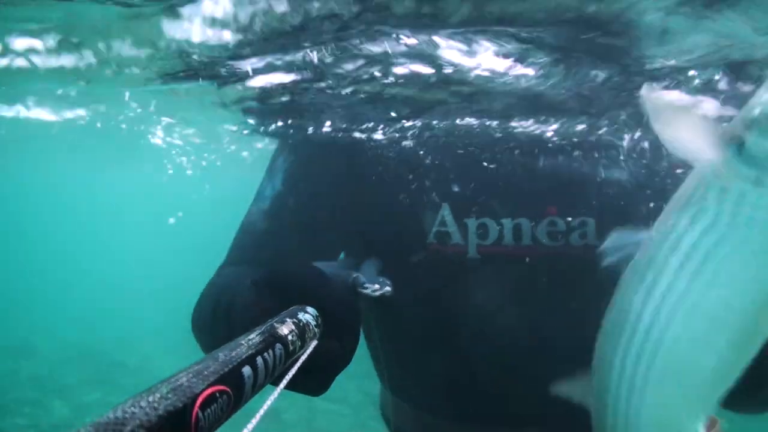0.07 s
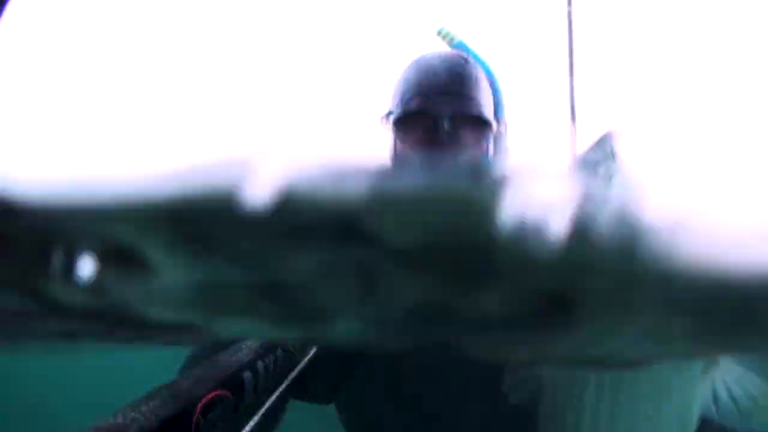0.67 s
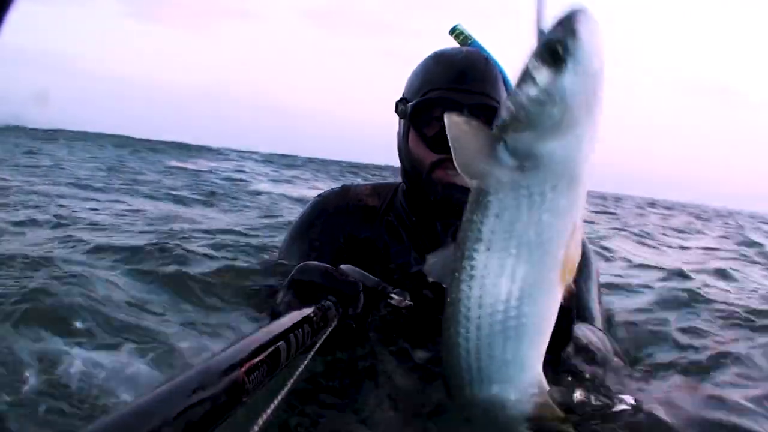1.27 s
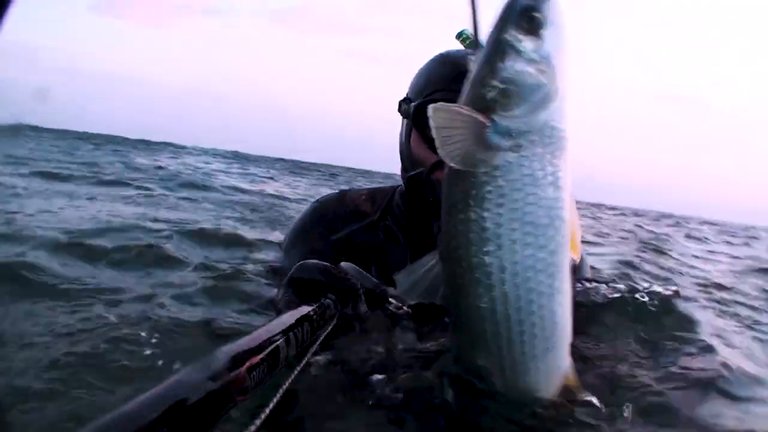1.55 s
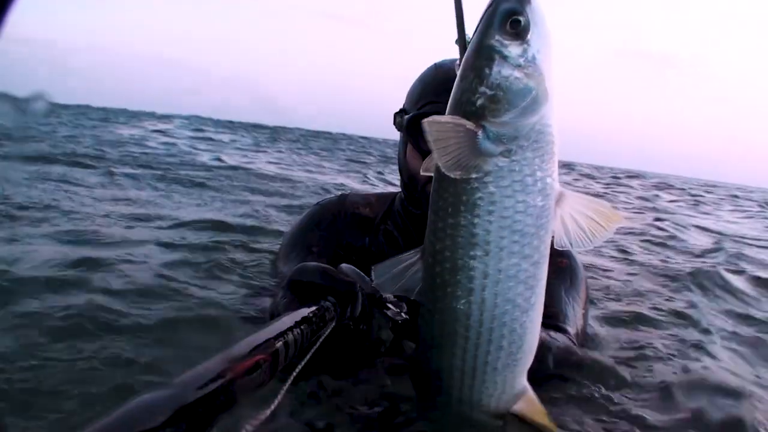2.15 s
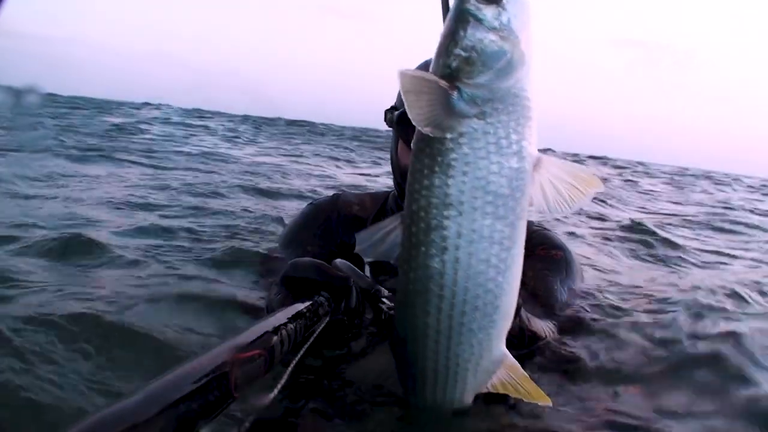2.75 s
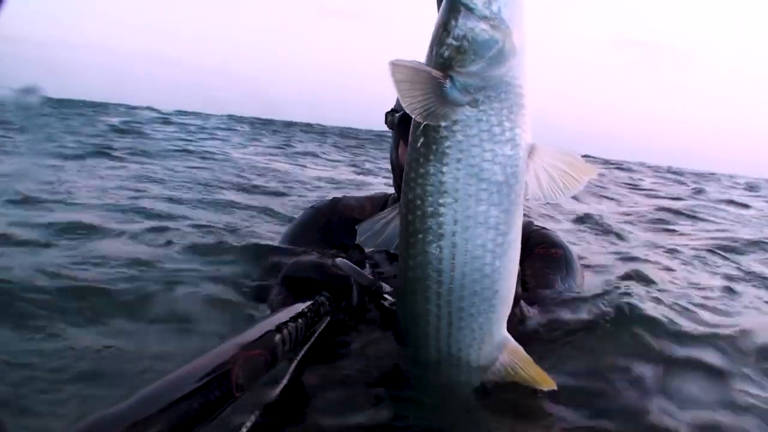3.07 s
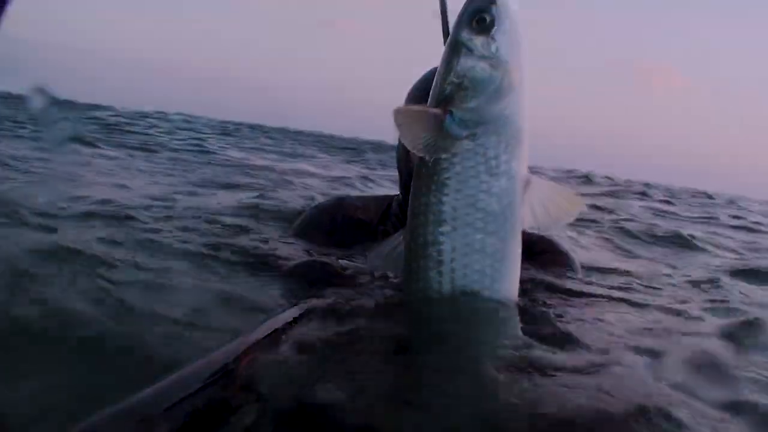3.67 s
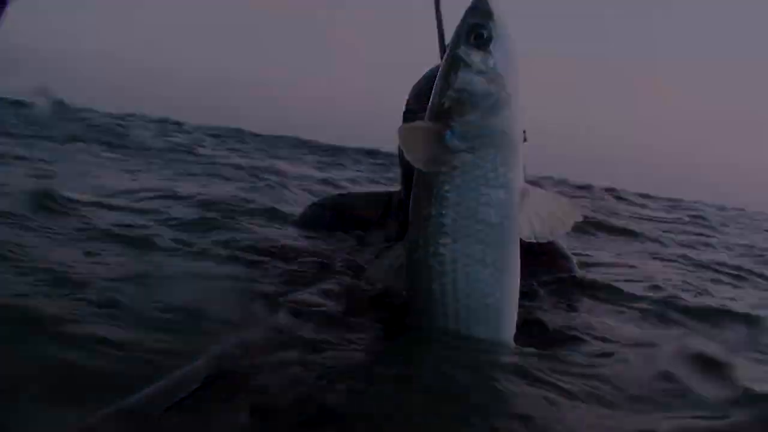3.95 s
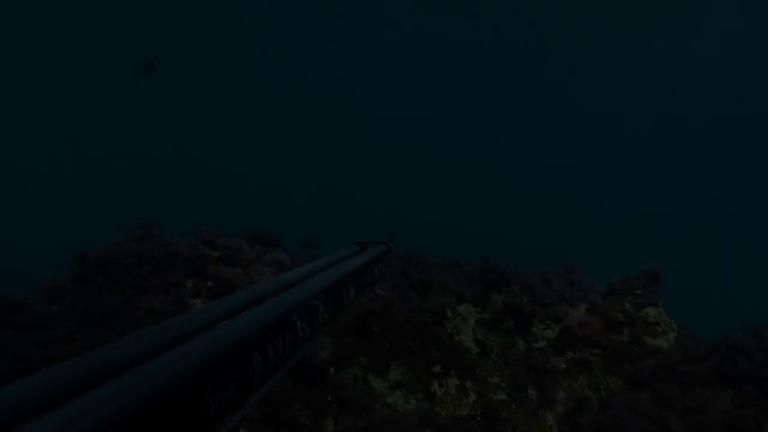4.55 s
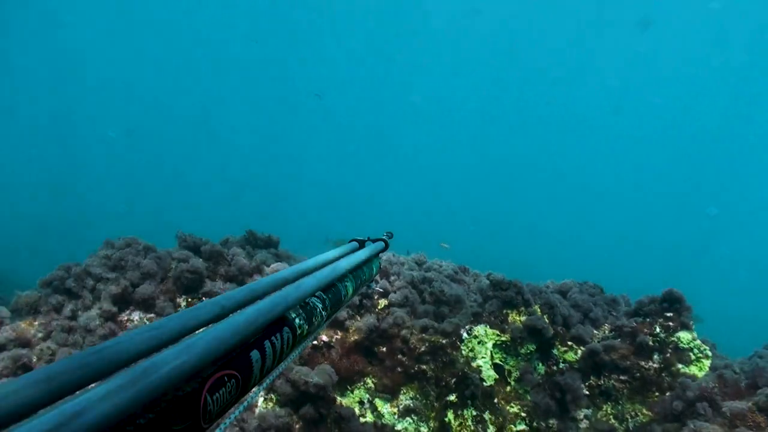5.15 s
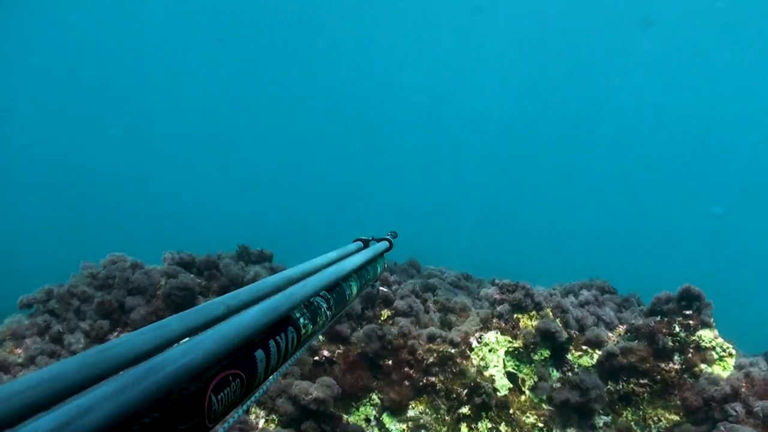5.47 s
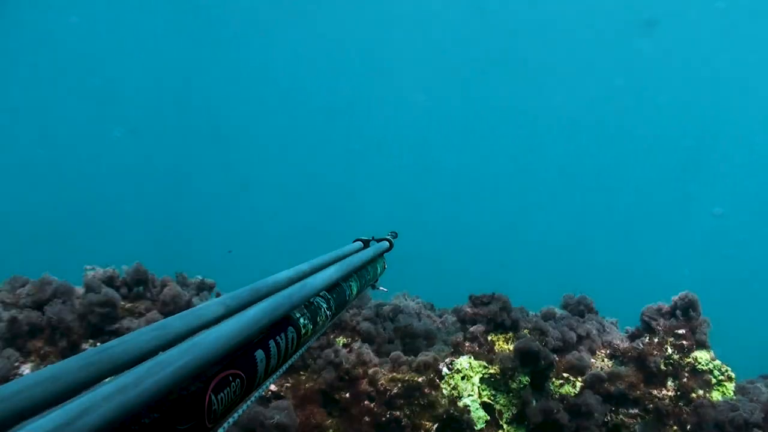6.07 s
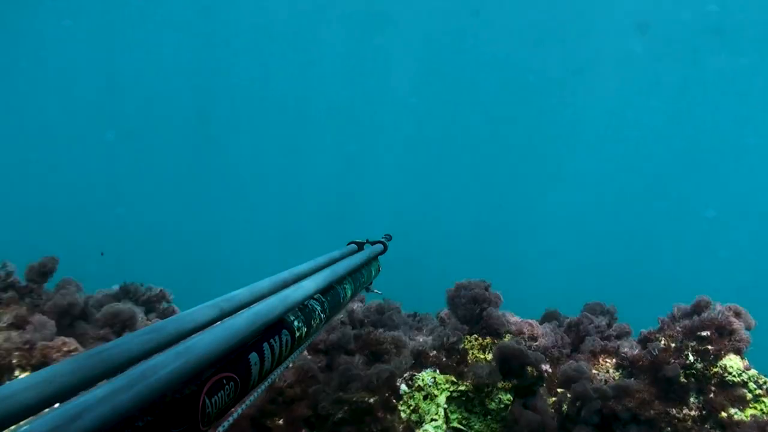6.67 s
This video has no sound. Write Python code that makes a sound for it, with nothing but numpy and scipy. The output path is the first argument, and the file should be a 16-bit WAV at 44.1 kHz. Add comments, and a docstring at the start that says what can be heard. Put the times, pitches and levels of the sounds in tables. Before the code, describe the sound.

Heard very close through a waterproof camera housing, a sudden bubbly splash comes up out of the sea, followed by fizzing runoff and drips. Small waves gurgle, plop and knock against the case, with a thin, faint whine behind them. A hard wet slap and a low rising wash end in an abrupt change to underwater quiet: crackling shrimp, a few sharper clicks, dull soft rubbing from a speargun and steady hiss.

```python
"""A sharp burst of bubbles and spray, then gurgles, plops and slaps, then an abrupt change to a quiet reef.
A camera on a speargun breaks the sea surface and floats in light chop: trapped air pockets ring,
wavelets knock the housing, water runs off, and the camera's electronics whine faintly.
On the reef, shrimp snap and the gun rubs softly, coloured by the submerged housing's resonances."""
import sys
import numpy as np
from scipy.fft import rfft, irfft, next_fast_len
from scipy.io import wavfile
from scipy.ndimage import map_coordinates

SR = 44100
rng = np.random.default_rng(int(sys.argv[2]) if len(sys.argv) > 2 else 0)


def wav_out(sig):
    """Save sig, one row per channel (or a flat mono array), as 16-bit PCM at SR to the path in sys.argv[1]."""
    wavfile.write(sys.argv[1], SR, np.round(np.clip(np.atleast_2d(sig).T, -1, 1) * 32767).astype(np.int16))


N = 304290


def bubble(db, hz, rise_s, life_s, sharp, settle_s=0.0044, decay_power=1.4):
    """An air pocket swells into tone, gliding from hz * (1 + sharp) to hz as it settles on the wall."""
    t = np.arange(int(4 * life_s * SR)) / SR
    cycles = hz * (t + sharp * settle_s * (1 - np.exp(-t / settle_s)))
    attack = 1 - np.exp(-(t / rise_s) ** 2)
    return amp(db) * np.sin(2 * np.pi * cycles) * attack * np.exp(-(t / life_s) ** decay_power)


def plops():
    """Air pockets pinch off with a wet smack and ring; larger, lower ones swell more slowly."""
    # Each row: start in seconds, level in dB, pitch in Hz, life in seconds, initial pitch offset ratio.
    pockets = [(0.044, -51.5, 253, 0.047, 0.02), (.077, -42, 1113, 0.014, 0.086),
               (.4347, -26, 2880, 0.0061, 0.01), (0.4436, -3.5, 1810, .0068, 0.064),
               (0.448, -3, 1425, 0.0057, 0.12), (0.4599, -17, 1750, 0.011, -0.091),
               (0.4787, -5.5, 1832, 0.013, 0.06), (.48, -29.5, 4530, 0.0045, .14),
               (0.5027, -27, 4320, 0.003, 0.02), (.513, -29, 3250, 0.0068, .08),
               (0.571, -26.5, 1494, 0.0074, 0.096), (.801, -35.5, 248, 0.018, 0.16),
               (.823, -29, 163, 0.032, -0.011), (.939, -31.5, 135, 0.017, 0.22),
               (1.0822, -19, 1670, 0.0082, -0.026), (1.117, -37, 1790, 0.021, 0.18),
               (1.137, -28.5, 3340, 0.0027, 0.047), (1.178, -27, 1724, 0.0055, -0.026),
               (1.179, -32, 700, 0.01, 0.31), (1.197, -40, 1820, .009, .1), (1.386, -29.5, 677, .011, 0.28),
               (1.386, -29, 353, 0.0076, 0.49), (1.47, -35.5, 1720, 0.0066, 0.096),
               (1.541, -36, 1760, 0.0049, 0.038), (1.728, -31, 1700, 0.0097, 0.16),
               (1.787, -34.5, 1660, 0.0085, 0.1), (1.862, -29.5, 431, 0.0075, -0.21),
               (1.877, -36, 342, 0.0092, 0.25), (2.126, -36, 229, 0.022, 0.31),
               (2.139, -35.5, 60, 0.044, .17), (2.8415, -41, 2280, 0.0043, -0.016),
               (2.889, -45.5, 1960, 0.008, 0), (2.9535, -34.5, 977, 0.0079, 0.027),
               (2.983, -38.5, 933, .01, 0.035), (3.307, -25.5, 1078, 0.014, -0.067),
               (3.344, -10.5, 797, 0.011, 0.19), (3.604, -26.5, 573, 0.018, -0.095),
               (3.604, -23.5, 220, 0.01, 0.039), (3.621, -32.5, 85.6, 0.053, .1),
               (3.9178, -28.5, 1185, .007, 0.016), (4.1755, 1.5, 894, 0.0026, -0.063),
               (4.181, -4.5, 800, .0033, 0.1), (4.179, -30, 217, 0.034, -0.17),
               (4.2895, -18.5, 760, .012, 0.13)]
    out = np.zeros(N)
    for s, db, hz, life_s, sharp in pockets:
        rise_s = 0.0017 * (1000 / hz) ** 0.75
        add(out, s, bubble(db, hz, rise_s, life_s, sharp))
    smacks = [(s, db / 2 - 27.5, hz) for s, db, hz, *_ in pockets]
    return out + ticks(smacks, t60_s=0.066, width_oct=0.71, rise_s=0.0006)


def knocks():
    """Wavelets slap the housing on its mount; the wet lens port rings as it clears the water."""
    # Each row: start in seconds, gain in dB, tilt in dB per octave.
    slaps = [(0.041, -47.5, -4), (.445, -25, 6.5), (0.487, -46, 4.5), (.922, -40, 2), (1.184, -43, -2),
             (1.213, -41, 2), (1.387, -53, 3), (1.872, -37.5, 3.5), (2.1, -33.5, 7), (2.125, -34, 0.5),
             (3.168, -41.5, -0.5), (3.607, -30.5, -0.5), (4.1732, -17.5, 2.5), (4.198, -25, 0)]
    # Each row: start in seconds, gain in dB.
    port_exits = [(0.4425, -35.5), (.480, -24.5)]
    # Each row of both: frequency in Hz, level in dB, t60 in seconds.
    housing_modes = [(99, -2, 0.24), (154, -15, .08), (216.2, -4.5, .1), (258.7, -9.5, .06),
                     (340, -8, 0.032), (446, -8.5, .04), (638, -6.5, 0.044), (720, -5, 0.051),
                     (987, -2.5, 0.055), (1150, -10, 0.026), (2060, -15.5, .03), (2150, -18.5, 0.02),
                     (3440, -15.5, 0.014)]
    port_modes = [(756, -2, 0.18), (815, -4.5, 0.051), (1053, 0, 0.33), (1136, -3.5, .15)]
    out, t = np.zeros(N), np.arange(SR // 3) / SR
    for s, db, tilt_db in slaps:
        add(out, s, amp(db) * ring(housing_modes, t, tilt_db, rise_s=0.0031))
    for s, db in port_exits:
        add(out, s, amp(db) * ring(port_modes, t, tilt_db=0, rise_s=0.0034))
    return out


def spray():
    """Droplets and bursting films tick brightly."""
    # Each row: start in seconds, level in dB, centre in Hz.
    droplets = [(.341, -41.5, 5400), (.383, -38, 3060), (.400, -39, 8650), (.4325, -32, 4350),
                (.4435, -25, 4100), (.445, -36, 7350), (.450, -15, 2560), (.473, -20.5, 4230),
                (.4762, -28, 6600), (.4765, -39, 11400), (.485, -29, 8100), (.5035, -35.5, 9300),
                (.519, -27.5, 6230), (.533, -37.5, 7860), (.625, -36, 5000), (.966, -34.5, 3380),
                (1.0685, -24, 9500), (1.070, -30, 3940), (1.727, -38.5, 5900), (2.100, -39, 2900),
                (3.3325, -36, 2700), (3.347, -39, 2660), (4.184, -29, 1830), (4.183, -32.5, 3470),
                (4.202, -40.5, 4320)]
    return ticks(droplets, t60_s=0.02, width_oct=0.34, rise_s=0.0011)


def froth(peak_s=0.484, spread_s=0.0198, db=-36, centre_hz=3740, spread_oct=0.42, count=30):
    """The water film tears into tiny chirping bubbles as the camera comes up."""
    out = np.zeros(N)
    for when, pitch, size in rng.standard_normal((count, 3)):
        hz = centre_hz * 2 ** (spread_oct * np.clip(pitch, -2, 2))
        chirp = bubble(db + 3 * size, hz, rise_s=1.5 / hz, life_s=12 / hz, sharp=0.065)
        add(out, peak_s + spread_s * when, chirp)
    return out


def gurgle(level_db, centre_hz, spread_oct, life_cycles, count):
    """Small bubbles ring at random times, their loudness following level_db."""
    out = np.zeros(N)
    for at, (pitch, size) in zip(rng.integers(0, N, count), rng.standard_normal((count, 2))):
        hz = np.clip(centre_hz * 2 ** (spread_oct * pitch), 60, 9000)
        blip = bubble(level_db[at] + 3 * size, hz, rise_s=2.9 / hz, life_s=life_cycles / hz, sharp=0.099)
        add(out, at / SR, blip)
    return out


def patter(level_db, centre_hz, count, spread_oct=0.6):
    """Tiny wet ticks at random times, louder where the water moves more."""
    rows = []
    for at, (pitch, size) in zip(rng.integers(0, N, count), rng.standard_normal((count, 2))):
        hz = centre_hz * 2 ** (spread_oct * np.clip(pitch, -2, 2))
        rows.append((at / SR, level_db[at] + 3 * size, hz))
    return ticks(rows, t60_s=0.048, width_oct=0.6, rise_s=0.0006)


def water(wash_spectrum, surge_db, wash_db, fizz_db, swarm_db):
    """Moving water: low surge, wash in the housing's resonances, fizz and small bubbles."""
    # Each row of both: frequency in Hz, relative density in dB.
    surge_spectrum = [(12, -39), (20, -4.5), (76, -5.5), (145, -2), (178, -6), (300, -10.5), (380, -10.5),
                      (450, -10.5), (580, -34.5), (990, -120)]
    fizz_spectrum = [(900, -31.5), (1400, 3.5), (1800, 4.5), (2150, 2), (2400, -7.5), (2700, -4),
                     (3250, -7), (3550, -5.5), (3950, -13), (5000, -20), (5500, -16.5), (6200, -22),
                     (9000, -37.5)]
    surge = amp(surge_db + 2 * wobble(22)) * rush(surge_spectrum)
    wash = amp(wash_db + 2.8 * wobble(30)) * rush(wash_spectrum)
    fizz = amp(fizz_db + wobble(44)) * rush(fizz_spectrum)
    swarm = gurgle(swarm_db, centre_hz=694, spread_oct=0.46, life_cycles=5.4, count=160)
    return surge + wash + fizz + swarm


def surfacing():
    """Water streams and drips off the housing over a bright hiss and a high whine."""
    # Each row: time in seconds, then relative surge, wash and fizz levels in dB.
    levels = [(0.0, -60, -55.5, -56.5), (0.354, -66.5, -51, -53), (0.562, -55.5, -47.5, -47),
              (0.754, -56, -54.5, -54), (1.084, -54, -57, -52.5), (1.236, -64, -57.5, -55),
              (1.464, -58.5, -57, -55), (1.656, -58, -55, -52.5), (1.82, -57.5, -56.5, -56.5)]
    # Each row of both: frequency in Hz, relative density in dB.
    wash_spectrum = [(200, -26), (270, -2.5), (330, -13), (400, -21), (480, -20.5), (660, -7), (730, -1.5),
                     (850, -16), (1060, -1), (1250, -8), (1500, -22), (2500, -48)]
    hiss_spectrum = [(2350, -28.5), (4000, -2.5), (6120, -5), (7030, -4.5), (7480, -2.5), (8440, -5.5),
                     (9810, -9), (13000, -7.5), (15200, -13.5), (15800, -11.5)]
    surge_db, wash_db, fizz_db = curves(levels)
    runoff_db = 4 * swell(crest_s=0.58, half_s=0.1)
    wash_db, fizz_db = wash_db + runoff_db, fizz_db + runoff_db
    drips = gurgle(fizz_db + 8, centre_hz=2000, spread_oct=0.2, life_cycles=8, count=180)
    mist = gurgle(fizz_db + 5, centre_hz=4470, spread_oct=0.52, life_cycles=9.9, count=80)
    splatter = patter(fizz_db + 1, centre_hz=3200, count=70)
    tone = whine(-68, [(7300, -26.5), (7650, -6), (7950, -16.5), (8350, -2), (8650, -0.5), (9000, -24.5)])
    swish = amp(wash_db - 14) * rush([(3250, -28.5), (3500, 1), (3700, -4), (4100, -18.5)])
    stream = water(wash_spectrum, surge_db + 4, wash_db + 1.73, fizz_db - 4.25, swarm_db=wash_db - 0.3)
    return stream + swish + drips + mist + splatter + tone + amp(-61.5) * rush(hiss_spectrum)


def floating():
    """Chop laps at the camera and a wave runs up, over a duller hiss and a thin whine."""
    # Each row: time in seconds, then relative surge, wash and fizz levels in dB.
    levels = [(1.83, -60, -56, -61.5), (2.57, -61, -57, -63.5), (3.21, -57, -55, -63), (3.6, -61, -58, -63),
              (4.04, -63, -58, -63.5), (4.22, -62, -54.5, -62.5), (4.3, -57, -51.5, -62)]
    # Each row of both: frequency in Hz, relative density in dB.
    wash_spectrum = [(200, -36.5), (400, 9), (490, -3), (590, 9.5), (780, 0), (1000, 4.5), (1300, -6.5),
                     (1700, -52), (2500, -51)]
    hiss_spectrum = [(2800, -2), (3900, -2.5), (4200, 6), (4400, -8), (5200, -4.5), (7000, -1.5),
                     (8000, -5.5), (8900, -8.5), (9300, -13.5), (9750, -12.5), (10000, -61)]
    surge_db, wash_db, fizz_db = curves(levels)
    tone = whine(-68.5, [(4300, -10.5), (4560, 3.5), (4700, -1), (5000, -9)])
    overtone = whine(-78, [(8300, -20), (8600, -2), (8950, -2.5), (9200, -20)])
    undertone = amp(-71) * rush([(2380, -21), (2560, -13.5), (2750, -21.5)])
    run_up = wave()
    chop = water(wash_spectrum, surge_db + 1.7, wash_db + 0.1, fizz_db - 3, swarm_db=wash_db - 2)
    lapping = patter(wash_db + 2, centre_hz=1400, count=50)
    return chop + lapping + run_up + amp(-65) * rush(hiss_spectrum) + tone + overtone + undertone


def wave(start_s=4.307, rise_s=0.17, crest_db=-38.5):
    """A wave runs up: a low rush that grows, then holds."""
    # Each row: frequency in Hz, relative density in dB.
    spectrum = [(18, -49.5), (30, -14), (76, 8), (113, -17), (148, 1.5), (301, -13.5), (384, 1),
                (572, -7.5), (654, -16.5), (1020, 2.5), (1520, -23.5), (1940, -14), (2890, -31.5),
                (3680, -22), (6000, -62), (7800, -74), (13200, -120)]
    envelope = np.clip((clock() - start_s) / rise_s, 0, 1) ** 1.44
    return envelope * amp(crest_db + wobble(89)) * rush(spectrum)


def shrimp(stray_count=70, stray_db=-60, stray_hz=6000):
    """Near shrimp snap, each burst topped by a bright crack; fainter strays come at random."""
    # Each row: start in seconds, relative level in dB, centre in Hz.
    snaps = [(4.6982, -32, 4260), (4.7174, -43, 6370), (5.1304, -38, 4220), (5.1577, -47, 6720),
             (5.2582, -39, 3560), (5.498, -41.5, 5360), (5.5839, -41.5, 2990), (6.067, -43.5, 3200),
             (6.101, -48, 6300), (6.3802, -44, 3010), (6.5256, -49, 4630), (6.6876, -27.5, 3070)]
    strays = [(when * N / SR, stray_db + 8 * (size - 0.5), stray_hz * 2 ** (pitch - 0.5))
              for when, size, pitch in rng.random((stray_count, 3))]
    bodies = [(s, db - 8.5, hz) for s, db, hz in snaps]
    cracks = [(s, db - 12, 8480) for s, db, _ in snaps]
    return (ticks(bodies + strays, t60_s=0.027, width_oct=0.65, rise_s=0.00088)
            + ticks(cracks, t60_s=0.018, width_oct=0.8, rise_s=0.00066))


def far_shrimp(snaps_per_s=2100, spread_db=8):
    """Distant snaps merge into a crackle through the housing, a few much larger than the rest."""
    impulses = (rng.random(N) < snaps_per_s / SR) * rng.choice([-1, 1], N)
    sizes = amp(spread_db * np.minimum(rng.exponential(size=N), 3))
    return amp(-66) * unit(filtered(impulses * sizes, submerged_housing))


def rubbing():
    """The gun rubs softly: dull friction noise through the housing, swelling with pressure."""
    # Each row: crest in seconds, relative level in dB, half length in seconds.
    rubs = [(4.718, -47, 0.009), (4.798, -57, 0.014), (5.009, -56, 0.027), (5.353, -55, .02),
            (5.5, -61, 0.097), (5.89, -57.5, 0.013), (5.985, -48.5, 0.012), (6.214, -50, .008),
            (6.283, -56, 0.022), (6.396, -51.5, 0.0092), (6.842, -52, 0.023)]
    grain = filtered(rng.standard_normal(N), lambda hz: submerged_housing(hz) / (1 + (hz / 2000) ** 6))
    pressure = amp(-74.5) + sum(amp(db - 6.5) * swell(s, half_s) for s, db, half_s in rubs)
    return pressure * amp(4.7 * wobble(90)) * unit(grain)


def submerged_housing(hz):
    """Response of the housing under water: resonances of alternating sign."""
    # Each row: centre in Hz, width in Hz, gain in dB.
    modes = [(668, 72, -5), (1120, 230, 0.5), (1714, 100, 1), (1984, 143, -4), (3130, 390, -12),
             (3500, 100, -9.5), (4235, 200, -9), (5400, 450, -11.5), (6330, 190, -6.5), (7600, 2400, -13.5),
             (12560, 1300, -17.5)]
    return sum((-1) ** k * amp(db) * 1j * hz * width / (centre ** 2 - hz ** 2 + 1j * hz * width)
               for k, (centre, width, db) in enumerate(modes))


def reef():
    """Shrimp, rubbing and one soft, low bump over a deep hiss and a steady whine."""
    # Each row: frequency in Hz, relative density in dB.
    hiss_spectrum = [(12, -30), (20, 3.5), (126, -4), (603, 0), (819, -1.5), (1180, 0), (1470, -4.5),
                     (1690, -0.5), (2370, -7.5), (3310, -4.5), (3910, -8.5), (4630, -8), (10400, -16),
                     (13000, -13.5), (15800, -17)]
    snaps = shrimp()
    near = amp(17.5) * filtered(snaps, submerged_housing) + amp(-12.5) * snaps
    far, rub = far_shrimp(), rubbing()
    tone = whine(-79, [(8500, -25), (8780, 0.5), (9300, -20)], depth=0)
    bump = np.zeros(N)
    add(bump, 6.105, bubble(db=-55.5, hz=125, rise_s=0.0067, life_s=0.02, sharp=0.063))
    return near + far + rub + bump + tone + amp(-61) * rush(hiss_spectrum, width=0.6)


def whine(db, spectrum, flutter_hz=27, depth=0.55):
    """The camera's electrical whine: a narrow noise band, pulsing by depth."""
    return amp(db) * (1 + depth * np.sin(2 * np.pi * flutter_hz * clock())) * rush(spectrum)


def ring(modes, t, tilt_db, rise_s):
    """Damped modes with a soft attack, tilted by tilt_db per octave about 500 Hz."""
    tones = sum(amp(db + tilt_db * np.log2(hz / 500) - 60 * t / t60_s) * np.sin(2 * np.pi * hz * t)
                for hz, db, t60_s in modes)
    return tones * (1 - np.exp(-t / rise_s))


def ticks(rows, t60_s, width_oct, rise_s):
    """Short noise bursts. Each row: start in seconds, level in dB, centre in Hz."""
    out, t = np.zeros(N), np.arange(SR // 16) / SR
    attack = 1 - np.exp(-(t / rise_s) ** 2)
    for s, db, centre_hz in rows:
        noise = rng.standard_normal(len(t))
        band = filtered(noise, lambda hz: np.exp(-(np.log2((hz + 1) / centre_hz) / width_oct) ** 2))
        add(out, s, unit(band) * amp(db - 60 * t / t60_s) * attack)
    return out


def rush(spectrum, width=0.32):
    """Narrow stereo noise of rms 1, coloured by (Hz, dB) points."""
    points_hz, db = np.transpose(spectrum)
    colour = lambda hz: amp(np.interp(np.log(hz + 1), np.log(points_hz), db, -120, -120))
    mid, side = filtered(rng.standard_normal((2, N)), colour)
    return unit(np.array([mid + width * side, mid - width * side]))


def wobble(knots_per_s):
    """A smooth random curve."""
    return map_coordinates(rng.standard_normal(int(N * knots_per_s / SR) + 4), [clock() * knots_per_s])


def swell(crest_s, half_s):
    return np.exp(-((clock() - crest_s) / half_s) ** 2)


def curves(rows):
    """One value per sample for each column after the time."""
    s, *columns = np.transpose(rows)
    return [np.interp(clock(), s, column) for column in columns]


def filtered(x, response):
    """x through a response given as a function of Hz."""
    n = x.shape[-1]
    padded = next_fast_len(n + 8192)
    return irfft(rfft(x, padded) * response(np.fft.rfftfreq(padded, 1 / SR)), padded)[..., :n]


def add(track, start_s, sound):
    part = track[round(start_s * SR):][:len(sound)]
    part += sound[:len(part)]


def amp(db):
    return 10 ** (np.asarray(db) / 20)


def unit(x):
    return x / np.sqrt(np.mean(x ** 2) + 1e-20)


def clock():
    return np.arange(N) / SR


def scene(duller_s=1.825, reef_s=4.538, crossfade_s=0.0016):
    """Surfacing, floating with an abruptly duller hiss, then the reef; the left mic is more sensitive."""
    # Each row: time in seconds, splash level left minus right in dB.
    splash_balance = [(.45, 3.7), (.48, 2.3), (1.08, 3.7), (1.18, 1.8), (3.9, 2.1), (4.18, -.3),
                      (4.29, 2.4)]
    duller, deep = (np.clip((clock() - s) / crossfade_s, 0, 1) for s in (duller_s, reef_s))
    sides = np.array([[0.5], [-0.5]])  # left, right
    surface = ((1 - duller) * surfacing() + duller * floating()) * amp(2.2 * sides)
    splashes = plops() + knocks() + spray() + froth()
    right_lead_rad = lambda hz: 0.3 * np.exp(-np.log2((hz + 1) / 1900) ** 2)
    splashes = filtered(splashes, lambda hz: np.exp(-1j * right_lead_rad(hz) * sides))
    splashes *= amp(curves(splash_balance)[0] * sides)
    return (1 - deep) * (surface + splashes) + deep * reef() * amp(3.5 * sides)


def record(dry):
    """The camera's band limit cuts the highest treble."""
    return filtered(dry, lambda hz: hz < 15850)


dry = scene()
out = record(dry)
wav_out(out)
```